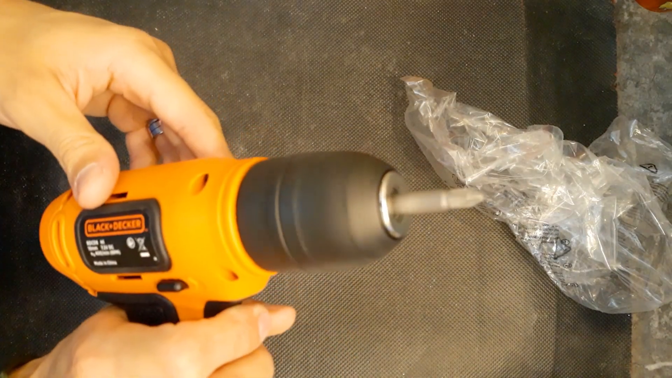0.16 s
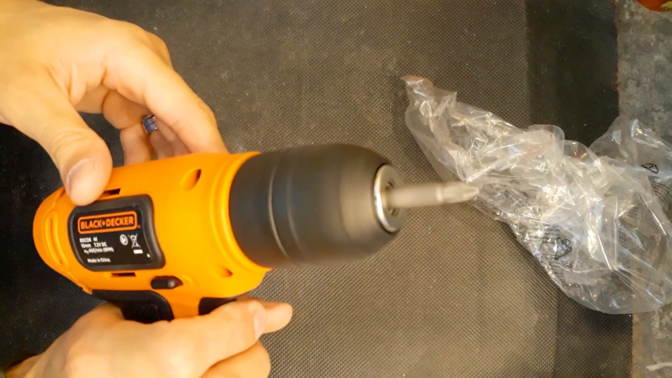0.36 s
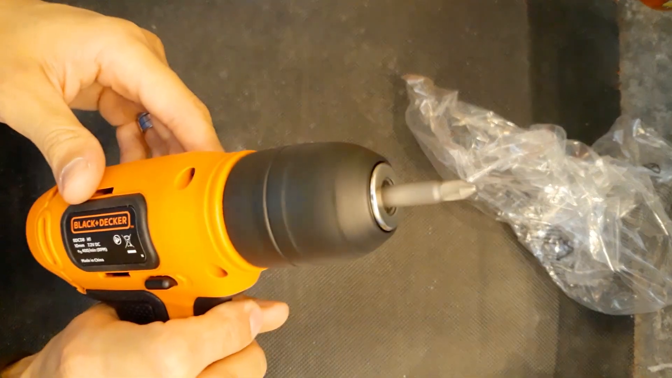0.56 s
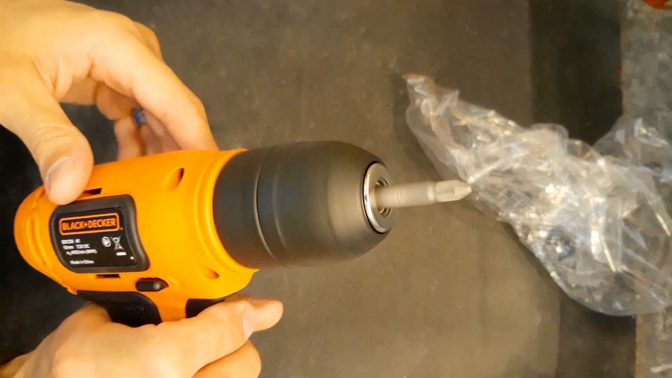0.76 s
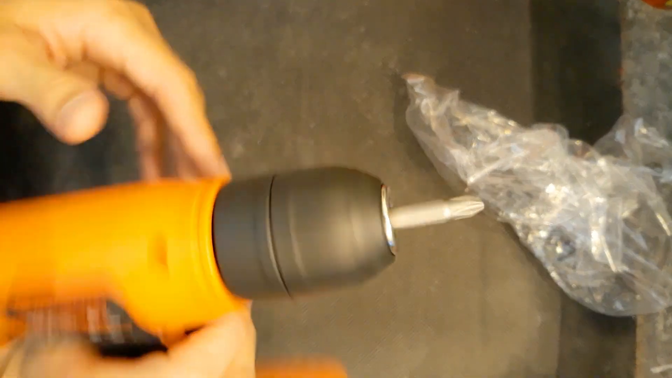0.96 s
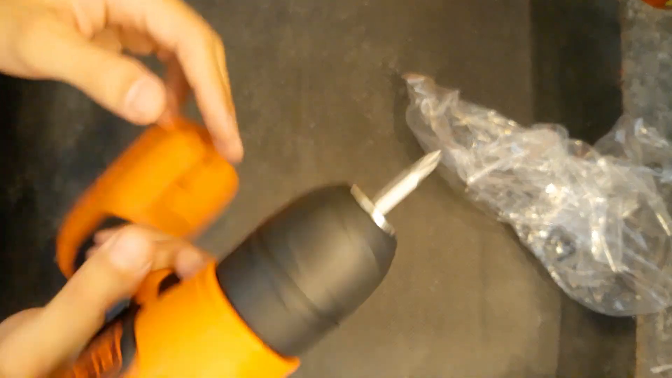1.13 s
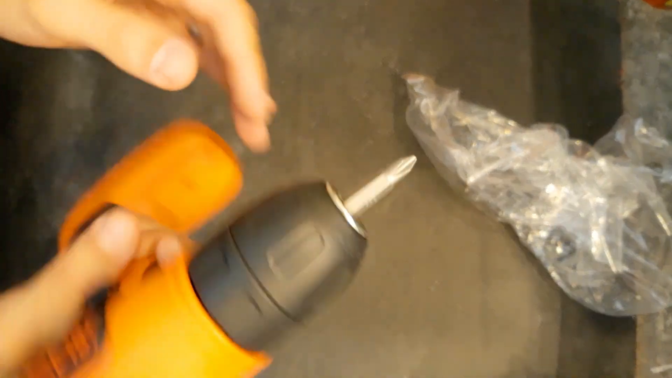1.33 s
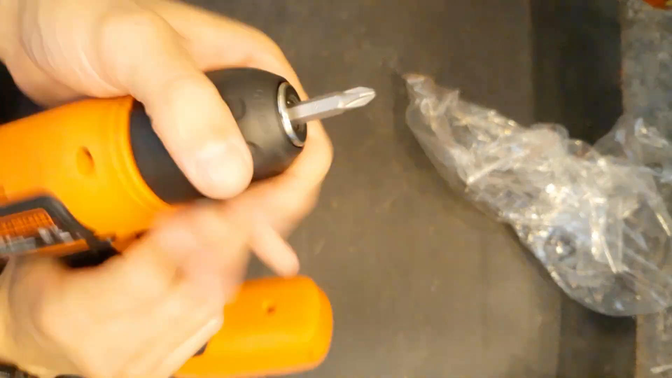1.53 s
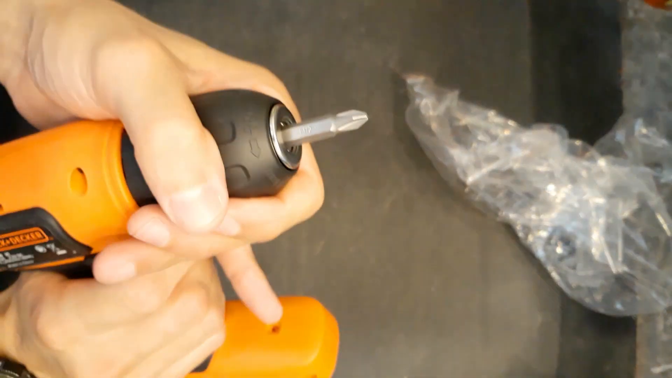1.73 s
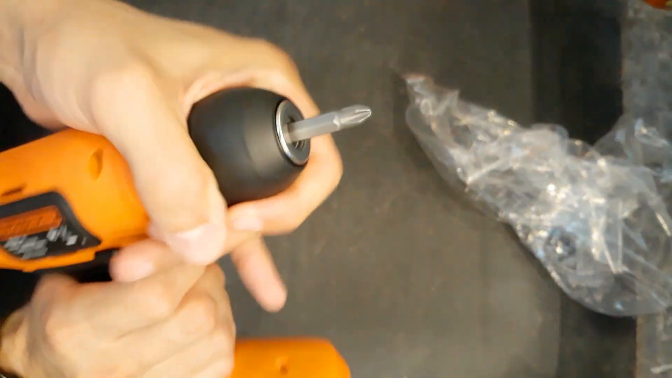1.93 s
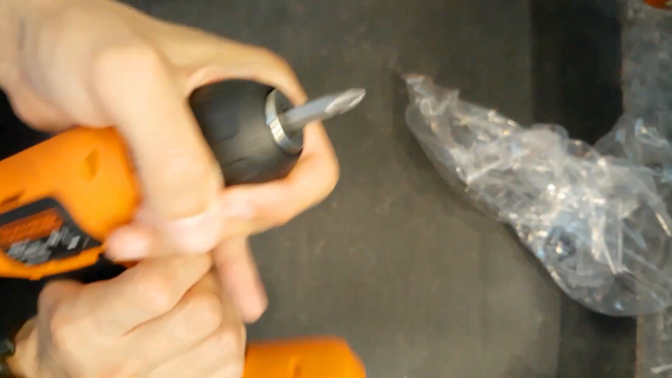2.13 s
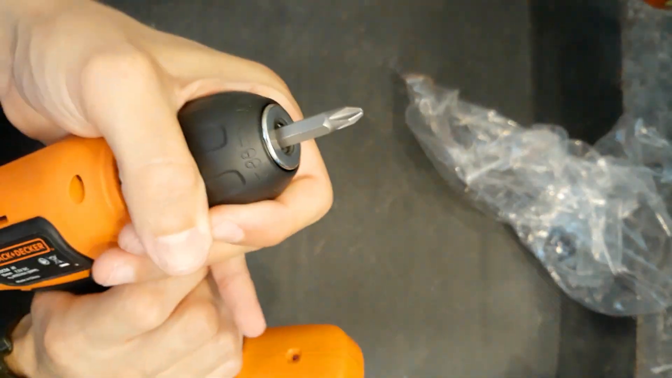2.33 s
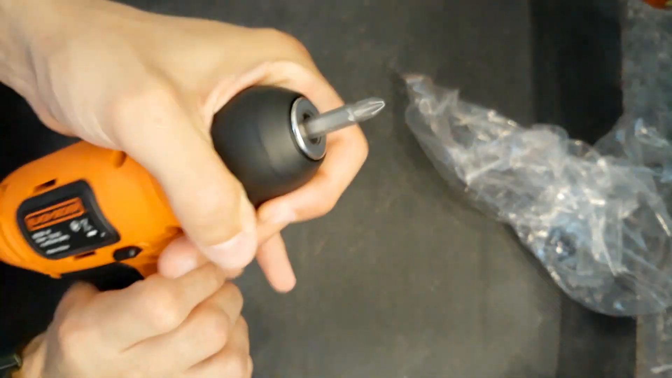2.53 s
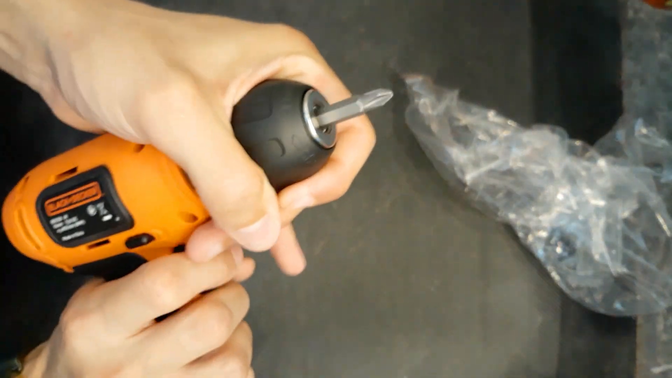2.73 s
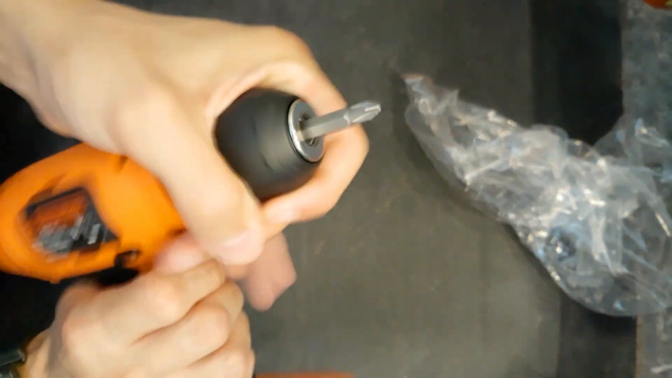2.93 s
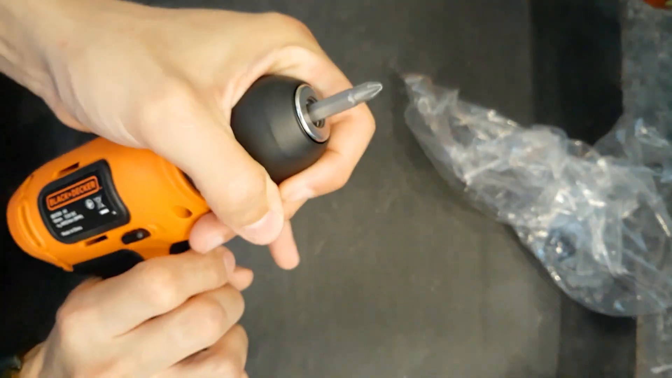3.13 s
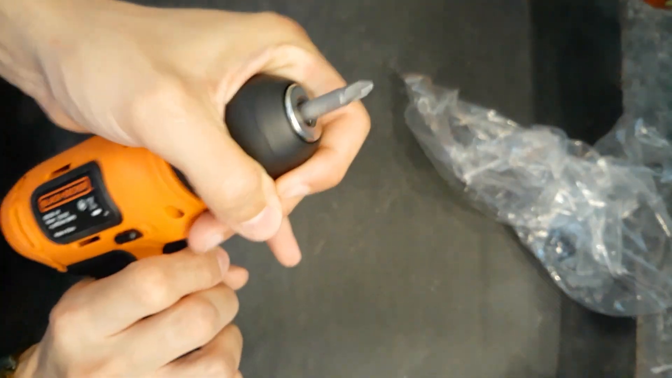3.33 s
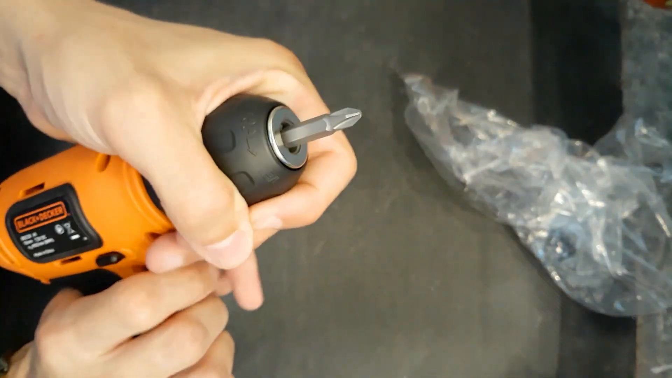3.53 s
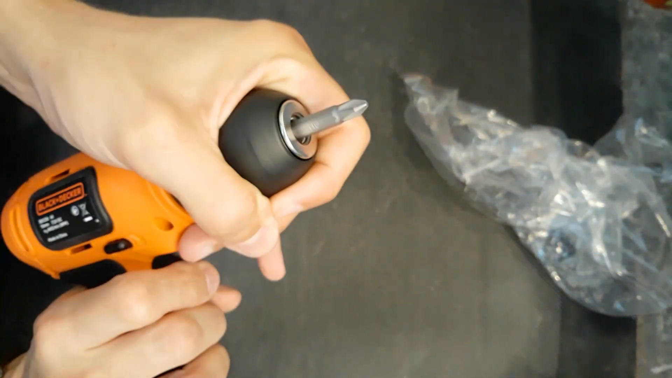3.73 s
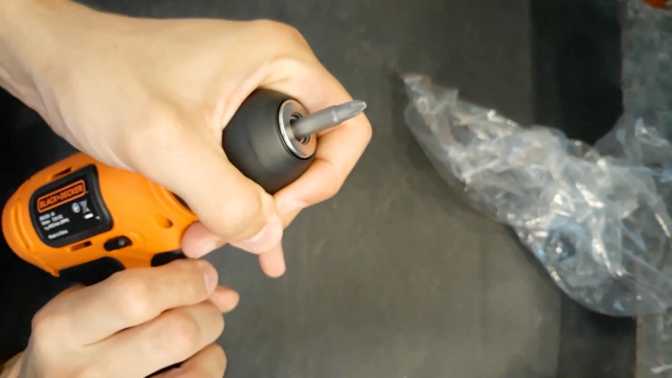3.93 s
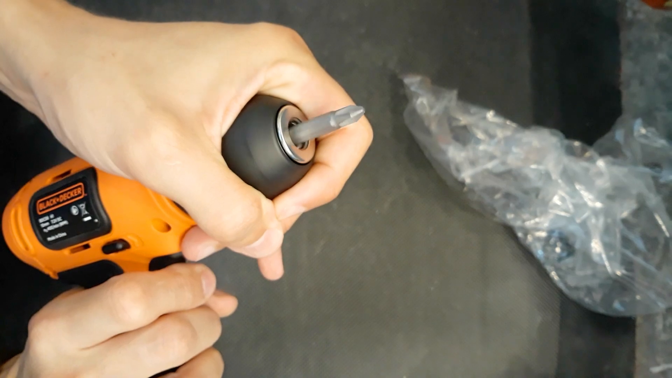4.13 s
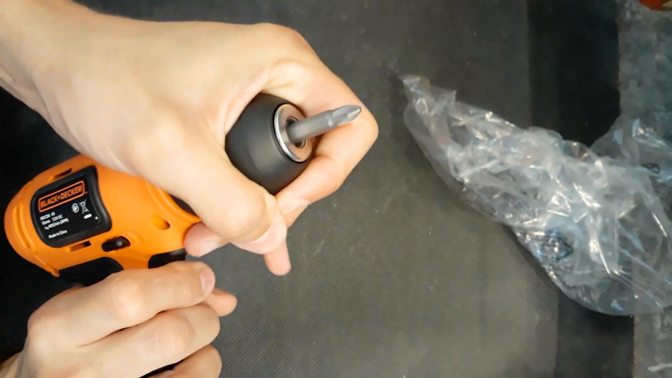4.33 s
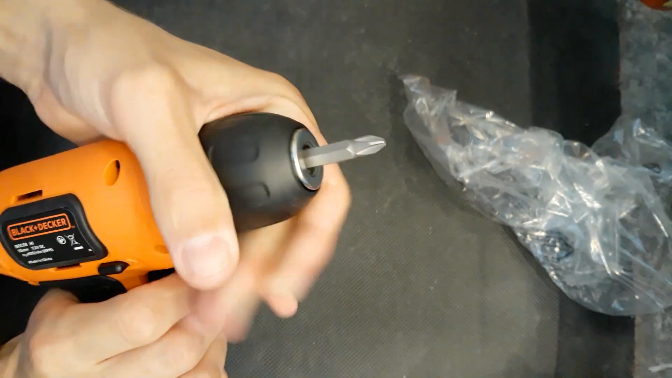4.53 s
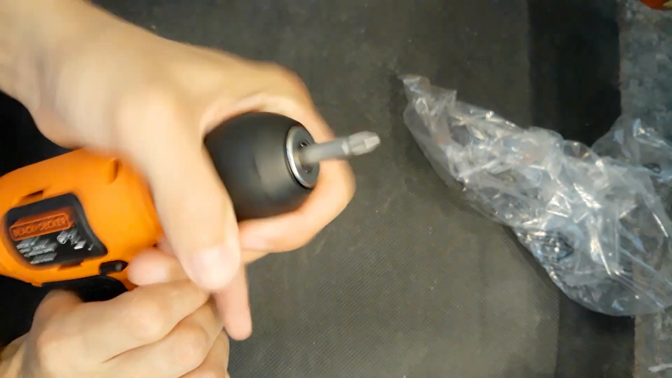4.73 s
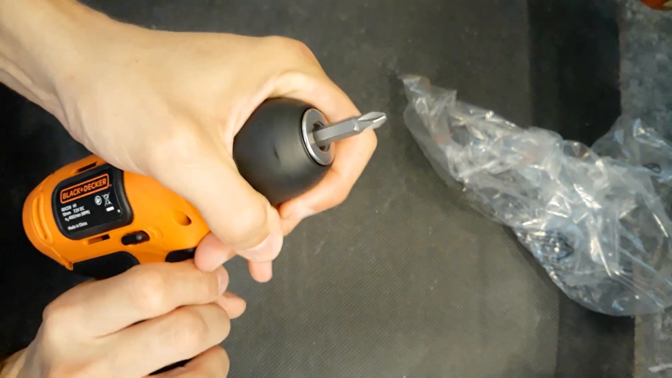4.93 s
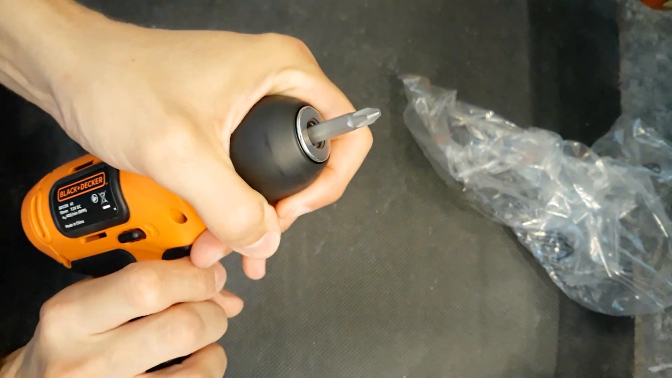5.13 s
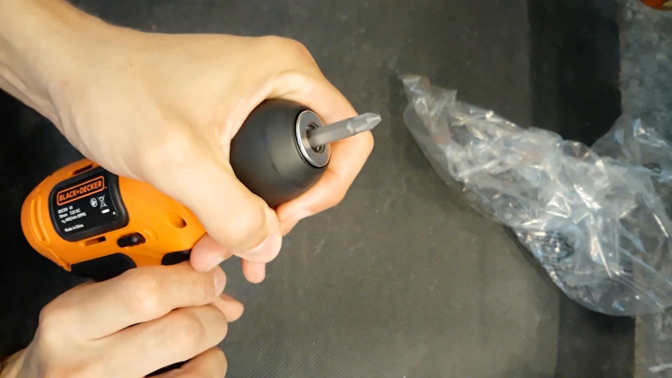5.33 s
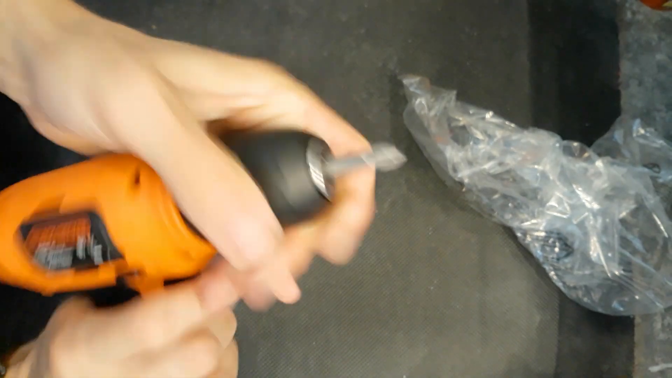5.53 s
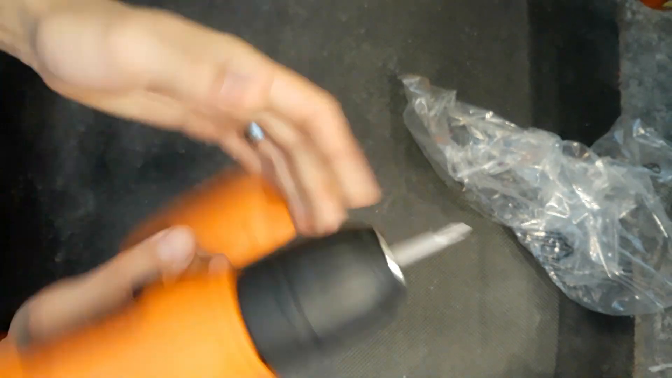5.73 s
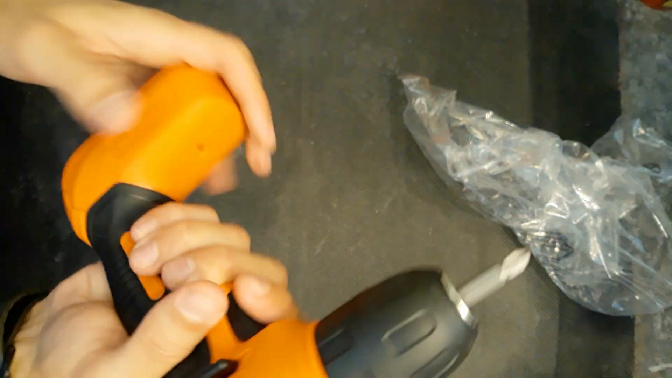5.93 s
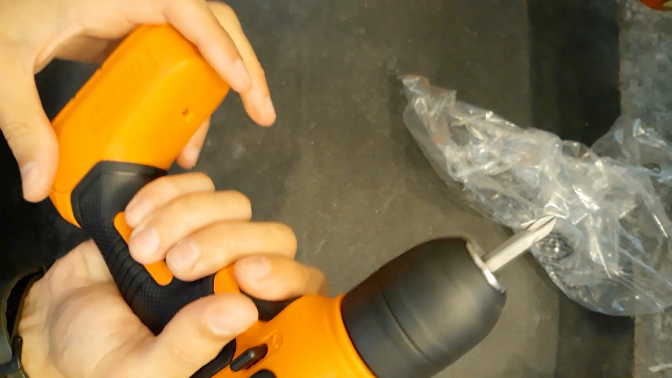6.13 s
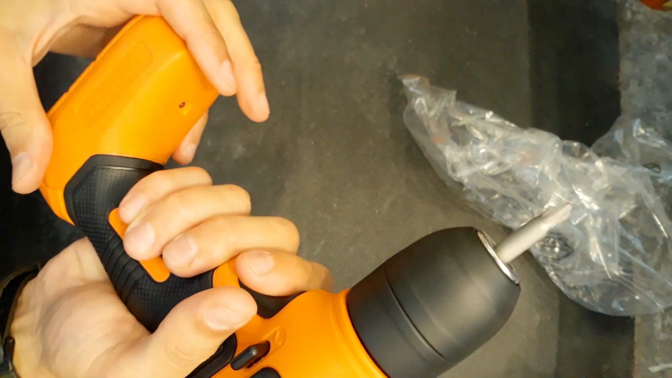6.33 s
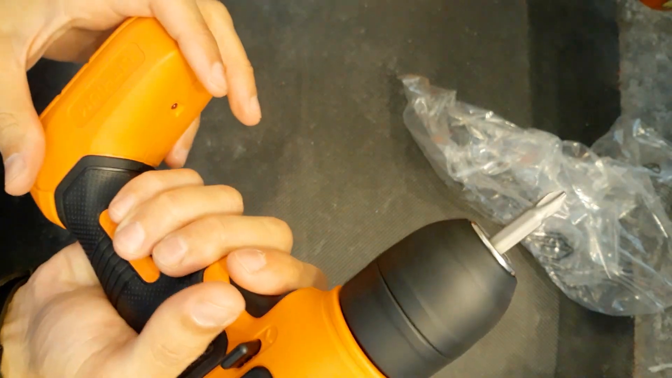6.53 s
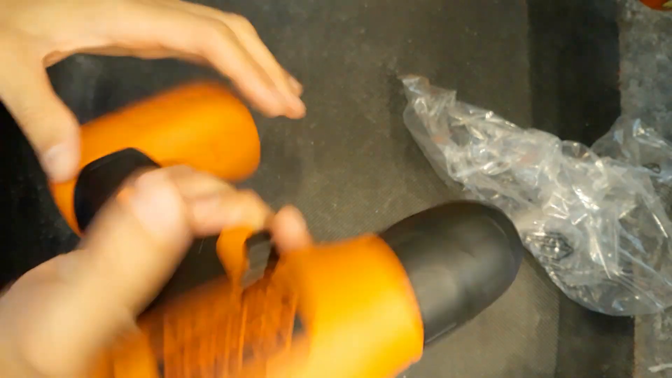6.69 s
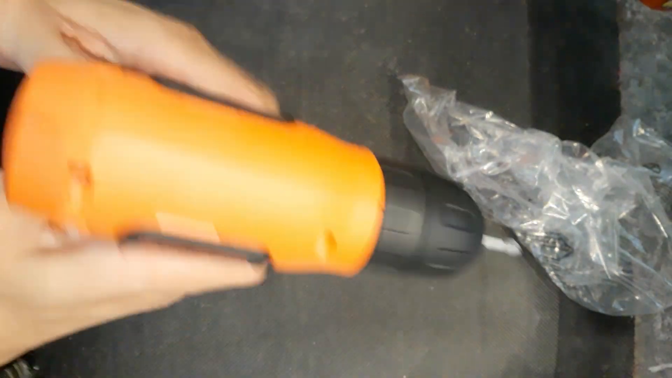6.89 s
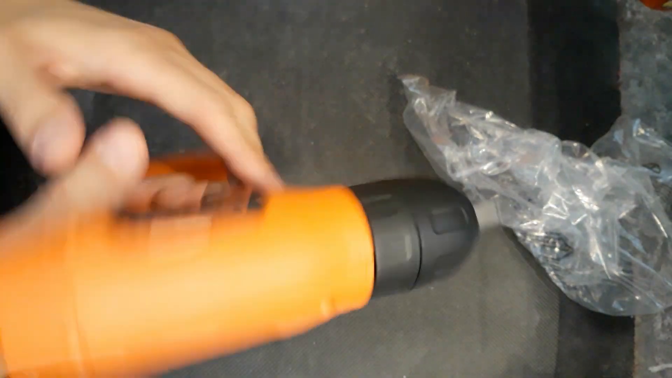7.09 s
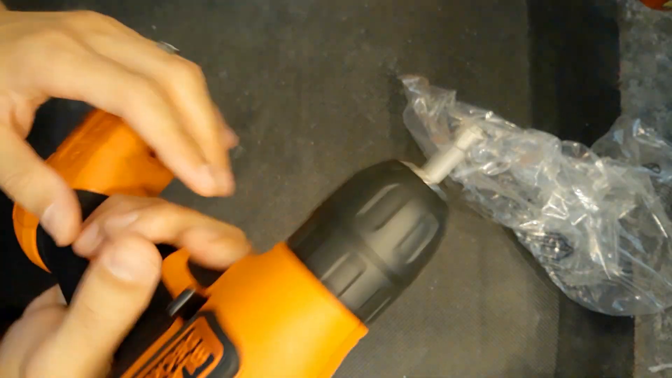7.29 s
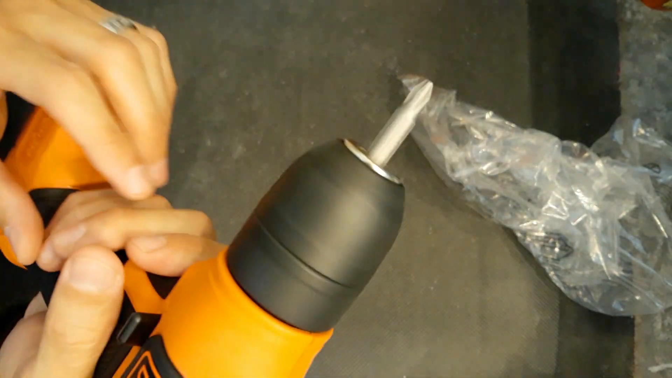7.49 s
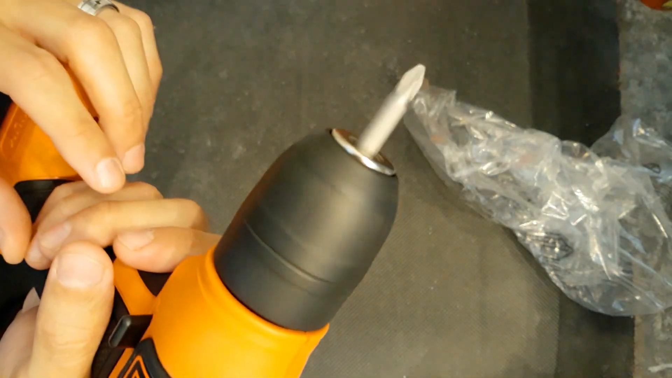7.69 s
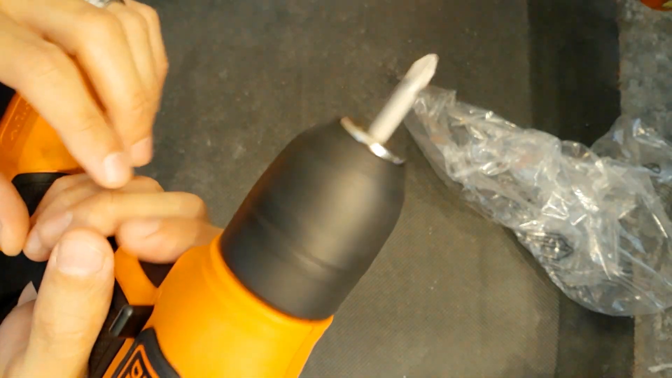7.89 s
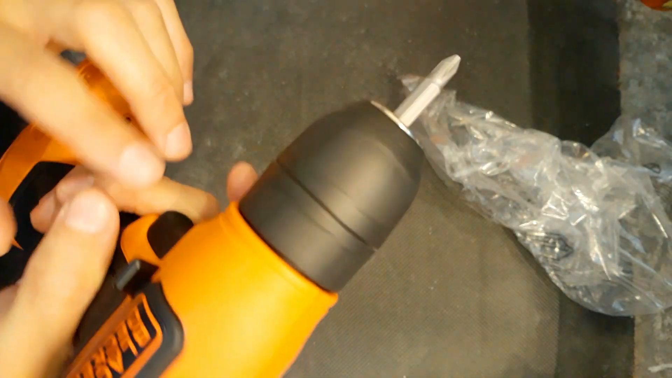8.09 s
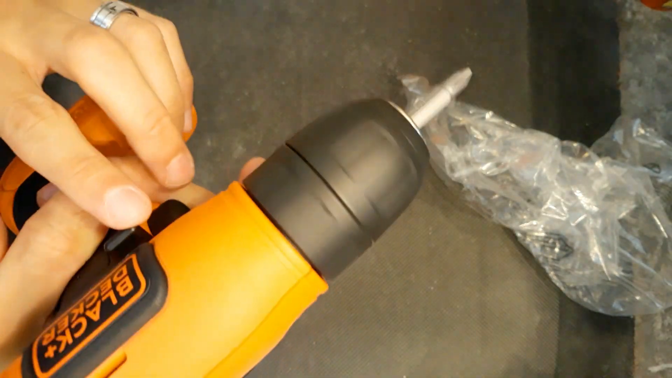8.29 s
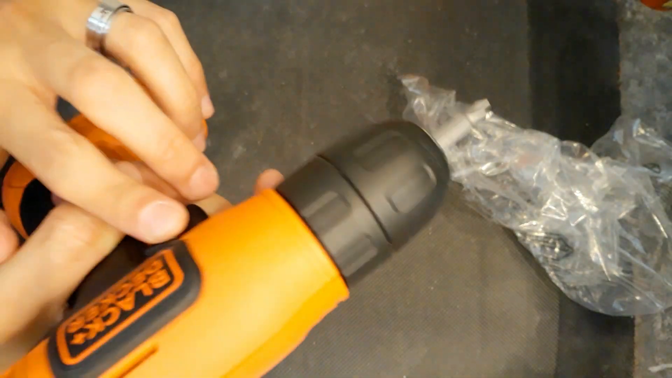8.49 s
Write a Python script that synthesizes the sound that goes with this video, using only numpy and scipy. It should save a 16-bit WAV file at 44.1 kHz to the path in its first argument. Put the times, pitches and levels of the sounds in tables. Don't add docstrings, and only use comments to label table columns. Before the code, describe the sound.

Close phone microphone in a small hard room with short bright echoes, soft air noise and a faint wavering mains hum. A cordless drill is already spinning free at the start, a steady high whine with gear rattle and brush hiss; at 0.9 s it is released and glides down, breaking into clicks by about 1.4 s. Light rubs and plastic ticks follow. Five hand-braked bursts come at about 1.9, 2.5, 3.0, 3.65 and 4.8 s: rougher, buzzing, lower and quickly stopped, the fourth longer and sagging, the last straining lowest before rising at 5.5 s. Handling ticks, then a bouncing switch clack at 5.9 s. A free whine leaps up at 6.2 s, released at 6.5 and coasting down; another starts at 7.45 s, holds until 8.0 and winds down. At 8.48 s two very loud, sharp switch snaps ring the housing almost together.

```python
import sys
import numpy as np
from scipy import signal
from scipy.fft import rfft, irfft
from scipy.io import wavfile
from scipy.ndimage import uniform_filter1d

SR = 44100
rng = np.random.default_rng(int(sys.argv[2]) if len(sys.argv) > 2 else 0)


def invert_db(level):
    return 10 ** (np.asarray(level, dtype=float) / 20)


def file_out(sig):
    cols = np.atleast_2d(sig).T
    lim = np.clip(cols, -1, 1)
    pcm = np.round(lim * 32767).astype(np.int16)
    wavfile.write(sys.argv[1], SR, pcm)


N = 377055

# frequency in Hz, level in dB per Hz.
HELD_BODY = [(150, -77), (250, -24.5), (543, -15), (780, -8.5), (1240, 2.5), (2480, -3.5), (3260, -14),
             (5020, -8), (7210, -10), (8870, -3.5), (9670, -8.5), (15400, -11.5)]


def evened(x):
    return x / np.sqrt(np.mean(x ** 2) + 1e-20)


def read(points, hz):
    f, value = np.transpose(points)
    return np.interp(np.log(hz + 1), np.log(f + 1), value)


def add(mix, s, sound):
    part = mix[round(s * SR):][:len(sound)]
    part += sound[:len(part)]


def drift(count, seconds):
    size = max(int(seconds * SR), 2)
    return evened(uniform_filter1d(uniform_filter1d(rng.standard_normal(count), size), size))


def narrow(x, hz, share):
    edges = np.clip([hz * (1 - share), hz * (1 + share)], 100, 20000)
    return evened(signal.lfilter(*signal.butter(2, edges, "band", fs=SR), x))


def housing_db(hz):
    # frequency in Hz, width in Hz, lift in dB.
    resonances = [(535, 123, 5.5), (1127, 134, 4), (1740, 250, 2.5), (2960, 130, 4), (3330, 730, 8.5),
                  (3800, 360, 5.5), (4445, 1500, 10), (4470, 130, -1), (5500, 330, -3), (7030, 200, -3.5),
                  (9970, 900, -9), (13200, 860, -6.5), (14200, 250, -4), (9140, 2000, 4), (11070, 820, -6),
                  (15150, 300, -10), (12900, 500, -6), (14050, 220, -10), (9400, 230, -3.5),
                  (12000, 380, -0.5), (13400, 290, 5.5), (14600, 300, 6.5)]
    return sum(db / (1 + (2 * (hz - f) / width) ** 2) for f, width, db in resonances)


def coloured(x, body, lo_hz, hi_hz, facing=1):
    hz = np.fft.rfftfreq(len(x), 1 / SR)
    band = np.sqrt(1 / (1 + (lo_hz / (hz + 1)) ** 16) / (1 + (hz / hi_hz) ** 16))
    return evened(irfft(rfft(x) * band * invert_db(read(body, hz) + facing * housing_db(hz)), len(x)))


def room_air():
    # frequency in Hz, level in dB per Hz.
    spectrum = [(15, -27), (25, -40), (79, -0.5), (339, -2), (398, 4), (612, -9), (801, -5), (1400, -7.5),
                (4350, -5), (6180, -11), (15400, -23.5)]
    air_db = -44.5
    hz = np.fft.rfftfreq(N, 1 / SR)
    air = invert_db(air_db - 6.5) * evened(irfft(rfft(rng.standard_normal(N)) * invert_db(read(spectrum, hz)), N))
    low = signal.sosfilt(signal.butter(2, 700, fs=SR, output="sos"), air)
    return low + (air - low) * invert_db(2.4 * drift(N, .04) - 4)


def mains_hum():
    # frequency in Hz, level in dB.
    steady = [(99, -66), (203, -66.5), (400, -65), (800, -70.5)]
    # middle in seconds, length in seconds, frequency in Hz, peak in dB.
    moments = [(0.054, 0.82, 249.5, -50.5), (1.283, 0.37, 249.5, -49), (1.802, 1.1, 249.5, -54.5),
               (3.61, 0.35, 249.5, -49.5), (4.393, 1.5, 249.5, -58.5), (6.597, 1.63, 249.5, -59),
               (8.143, 0.34, 249.5, -49), (8.55, 0.27, 249.5, -49.5), (1.219, 0.18, 297.7, -47),
               (2.04, 0.53, 298.7, -52.5), (3.606, 1.1, 298.7, -52), (6.421, 0.35, 303.8, -52),
               (6.993, 0.47, 302.3, -51), (7.32, 0.23, 295.8, -44), (7.803, .6, 301.5, -52)]
    rest_db = -69.5
    out, t = np.zeros(N), np.arange(N) / SR
    swells = {f: rest_db for *_, f, _ in moments}
    for s, length, f, db in moments:
        swells[f] = np.maximum(swells[f], db - 16 * (2 * (t - s) / length) ** 2)
    for f, db in steady + list(swells.items()):
        turns = np.cumsum(f + 2.6 * drift(N, 0.0324)) / SR
        out += np.sqrt(2) * invert_db(db - 0.5 + 3.3 * drift(N, 0.017)) * np.cos(2 * np.pi * turns)
    return out


def rumble():
    # time in seconds, level in dB.
    trembling = [(0, -69), (1, -75), (3.001, -84), (5.7, -82), (6.1, -65), (8.55, -74)]
    deep = signal.sosfilt(signal.butter(2, [25, 60], "band", fs=SR, output="sos"), rng.standard_normal(N))
    return invert_db(np.interp(np.arange(N) / SR, *np.transpose(trembling))) * evened(deep)


def room(x):
    # frequency in Hz, time to fall by 60 dB in seconds.
    dying = [(300, 0.69), (2000, 0.4), (6000, 0.15), (15000, 0.36)]
    taps = np.zeros(SR)
    at = np.arange(200, SR - 20, 20)
    taps[at + rng.integers(0, 20, len(at))] = rng.choice([-1., 1.], len(at))
    hz, t, z = signal.stft(taps, SR, nperseg=256)
    tail = signal.istft(z * invert_db(-60 * t / read(dying, hz)[:, None]), SR, nperseg=256)[1]
    return signal.fftconvolve(x, tail / np.linalg.norm(tail))[:N]


def rubbing():
    # start in seconds, end in seconds, level in dB, pitch in Hz.
    rubs = [(1.534, 1.66, -52.5, 8400), (1.6, 1.66, -50.5, 3600), (1.655, 1.68, -60, 1850),
            (1.74, 1.8, -53.5, 4600), (7.26, 7.34, -63, 1900), (7.15, 7.21, -58, 3800),
            (7.35, 7.44, -67, 2300), (5.95, 5.99, -48.5, 6400), (4.59, 4.64, -35.5, 3200),
            (5.76, 5.8, -46, 3350), (7.088, 7.138, -57, 8000), (7.112, 7.198, -69, 11000),
            (7.338, 7.432, -63, 13000)]
    out = np.zeros(N)
    for start, end, db, hz in rubs:
        size = round((end - start) * SR)
        noise = rng.standard_normal(SR // 5)
        add(out, start, invert_db(db) * narrow(noise, hz, 0.17)[:size] * np.hanning(size))
    return out


def plastic_ticks():
    # time in seconds, peak in dB, pitch in Hz.
    clicks = [(1.506, -40, 4360), (1.725, -46, 5100), (1.7554, -47, 4470), (1.8607, -39.5, 3900),
              (2.2, -34, 3300), (2.2005, -31, 7900), (5.7744, -32, 3370), (2.392, -44, 4370),
              (3.4503, -22, 4060), (5.603, -29, 3220), (5.8194, -38, 3500), (5.896, -44, 5300),
              (5.908, -37, 5250), (6.114, -51, 3800), (7.1646, -44, 5000), (7.3432, -48, 12000),
              (7.3756, -41, 5030), (7.102, -42, 8200), (1.459, -46, 5050), (8.4895, -14, 5330),
              (8.482, -13, 3750)]
    # time in seconds, level in dB,
    # pitch in Hz.
    further = [(1.9037, -32, 3600), (2.4793, -28, 3200), (6.1934, -35, 3900), (7.4454, -26, 4000),
               (1.6013, -50, 9000), (7.411, -52, 8000), (7.426, -46, 3300), (7.367, -50, 5100),
               (7.307, -52, 1800), (1.665, -50, 1500)]
    out, t = np.zeros(N), np.arange(SR // 5) / SR
    for s, db, hz in clicks + further:
        noise = rng.standard_normal(len(t))
        tick = narrow(noise, hz, .04) * invert_db(-60 * t / .055)
        tick += .05 * np.diff(noise, prepend=0) * invert_db(-60 * t / 0.013)
        add(out, s, invert_db(db - 4.0) * tick)
    return out


def dry_snaps():
    # time in seconds, level in dB.
    snaps = [(1.602, -42), (1.727, -53), (1.903, -41), (2.296, -53), (2.478, -40), (2.985, -46),
             (3.641, -42), (7.367, -56), (8.4785, -24)]
    out, t = np.zeros(N), np.arange(SR // 5) / SR
    for s, db in snaps:
        add(out, s, invert_db(db - 60 * t / .02) * np.diff(rng.standard_normal(len(t)), prepend=0))
    return out


def switch_slider():
    # time in seconds, level in dB, bright crack in dB against it.
    throws = [
        (5.9198, -27.5, -11),
        (5.9315, -31.5, -2.5),
        (5.941, -40, -10),
        (5.958, -43, -8),
    ]
    # frequency in Hz, level in dB, time to fall by 60 dB in seconds.
    slider = [(1140, 3.5, 0.033), (1700, -3.5, 0.053), (2280, -4, 0.032), (2500, -5, 0.039),
              (3080, -4, .03), (3730, -3, 0.031), (5420, -15, .05), (5950, -6, 0.033), (7000, -8, 0.037),
              (8200, -10, .04)]
    out, t = np.zeros(N), np.arange(SR // 5) / SR
    for s, db, bright_db in throws:
        noise = rng.standard_normal(len(t))
        modes = sum(invert_db(level - 60 * t / t60) * narrow(noise, hz, 0.066) for hz, level, t60 in slider)
        crack = invert_db(bright_db - 60 * t / 0.069) * np.diff(noise, prepend=0)
        add(out, s, invert_db(db) * (modes + crack))
    return out


def switch_knocks():
    # time in seconds, peak in dB, low body in dB, bright crack in dB (both against the peak), low body in Hz.
    knocks = [
        (8.4822, 2, -22, -16, 1536),
        (8.4895, 3.5, -12, -18, 1740),
    ]
    out, t = np.zeros(N), np.arange(SR // 5) / SR
    ring = .5 * invert_db(-60 * t / .008) + .2 * invert_db(-60 * t / .1)
    ping = 1.6 * np.sin(2 * np.pi * 5300 * t) * invert_db(-60 * t / 0.0039)
    for s, db, low_db, bright_db, low_hz in knocks:
        noise = rng.standard_normal(len(t))
        crack = coloured(noise, HELD_BODY, 1280, 8400)
        crack += invert_db(bright_db + 8.0) * evened(np.diff(noise, n=2, prepend=[0, 0]))
        thump = invert_db(low_db - 13.0) * narrow(noise, low_hz, 0.072) * invert_db(-60 * t / 0.03)
        add(out, s, invert_db(db - 6.5) * (crack * ring + ping + thump))
    return out


def housing_flares():
    # start in seconds, end in seconds, level in dB, pitch in Hz.
    flares = [(1.03, 1.22, -30.5, 1820), (1.06, 1.22, -27, 3420), (0.98, 1.08, -27, 2960),
              (1.33, 1.46, -53, 3300), (6.86, 7.0, -37, 3030)]
    out = np.zeros(N)
    for start, end, db, hz in flares:
        size = round((end - start) * SR)
        noise = rng.standard_normal(SR // 4)
        add(out, start, invert_db(db) * narrow(noise, hz, 0.033)[:size] * np.hanning(size) ** .5)
    return out


def run_down(rows, drag):
    stop_hz, inertia_s = 95, .03
    s, hz, db = np.transpose(rows)
    friction, rate = drag
    rest = friction / rate
    end = s[-1] + np.log((hz[-1] + rest) / (stop_hz + rest)) / rate
    t = np.arange(s[0], end, 1 / SR)
    after = np.maximum(t - s[-1], 0)
    speed = (np.interp(t, s, hz) + rest) * np.exp(-rate * after) - rest
    speed = uniform_filter1d(speed, size=round(inertia_s * SR), mode="nearest")
    return t, after, speed, np.interp(t, s, db)


def gear_blows(turns, hz, after, spin):
    step = turns.astype(int)
    strength = np.minimum(rng.exponential(1, step[-1] + 4), 4)
    uneven = strength[step] * .5 + strength[step // 6]
    lumps_db = spin["lumps_db"] + 2.2 * np.clip(after / .05, .3, 1) * np.clip(1 - hz / 450, 0, 1)
    blows = invert_db(lumps_db * uneven) * (1 + spin["pulsing"] * np.exp(-(turns % 1) / 0.4))
    return blows * invert_db(spin["beat_db"] * np.cos(2 * np.pi * turns / 4.45 + 1.3 * drift(len(turns), 0.13)))


def gear_rattle(blows, rattle_db, hz, after, spin):
    # frequency in Hz, relative width, level in dB.
    gear_case = [(3300, 0.086, 3), (4360, 0.15, -8.5), (2760, 0.052, -6.5)]
    octaves = np.log2(hz / 930)
    coasting = np.clip(after / 0.004, 0, 1)
    teeth = blows * rng.standard_normal(len(hz))
    teeth /= np.sqrt(uniform_filter1d(teeth ** 2, size=4000))
    full_db, octave_db, no_current_db = spin["hiss"]
    hiss_db = full_db + octave_db * np.maximum(octaves, -1.5) + no_current_db * (1 - np.exp(-after / 0.0059))
    knock_db = spin["slowing_db"] * coasting * np.clip((720 - hz) / 250, 0, 1)
    body = spin["body"]
    out = invert_db(rattle_db - 0.5 * (8.5 - coasting) - 0.087 * knock_db) * coloured(teeth, body, 2310, 6760)
    out += invert_db(rattle_db + spin["low_db"] + 0.43 * coasting) * coloured(teeth, body, 200, 1945)
    out += invert_db(rattle_db + hiss_db - 2.5) * coloured(teeth, body, 4840, 16000, spin["facing"])
    case = sum(invert_db(db) * narrow(teeth, f, share) for f, share, db in gear_case)
    return out + invert_db(rattle_db + spin["case_db"] + knock_db) * case


def tone_levels(t, after, hz, pose, spin):
    *tone_db, drive_db, _ = pose
    octaves = np.log2(hz / 930)
    coasting = np.clip(after / 0.004, 0, 1)
    slack_db = np.clip(1.3 * uniform_filter1d(np.gradient(octaves) * SR, size=600), 0, 11) * (t > t[0] + .1)
    surge_top_db, surge_s = spin["surge"]
    since = (t - t[0]) / surge_s
    surge_db = surge_top_db * since * np.exp(1 - since) * (t[0] > 0)
    dying_db = 45 * np.clip(1 - hz / 350, 0, 1) * coasting
    levels = []
    for k, db, change in zip((1, 2, spin["third"]), tone_db, spin["coast_db"]):
        start_db = surge_db * k / 2 if k < 3 else -slack_db
        levels.append((k, db + (change + spin["slow_db"] * octaves) * coasting + start_db - dying_db))
    levels.append((4, spin["coast_db"][3] - 40 * (1 - coasting) - 30 * np.clip(hz / 600 - 1, 0, 1)))
    for k, db in spin["orders"]:
        levels.append((k, db + 1.0 + drive_db - (14 if k > 1 else 4) * coasting - (k > 2.2) * slack_db))
    return levels


def motor_tones(levels, turns, blows, rattle_db, hz, spin):
    out, count = np.zeros(len(hz)), len(hz)
    throb = uniform_filter1d(blows, size=90)
    throb = (throb / uniform_filter1d(throb, size=4000)) ** .85
    for k, db in levels:
        flutter_db = spin["fuzz_db"] * min(1, 0.5 + k / 8) * drift(count, 0.0021 * (1 + 3 / k))
        ring_db = spin["ringing"] * (housing_db(k * hz) - 11.5)
        gain = np.sqrt(2) * invert_db(rattle_db + db + read(spin["voice"], k * hz) + ring_db + flutter_db)
        smear = (k > 4.5) * spin["smear"] * drift(count, 0.0039)
        tone = np.cos(2 * np.pi * (k * turns + rng.random() + smear))
        out += gain * (throb if k > 2.2 else 1) * tone
    return out


def burst(rows, pose, drag, spin):
    t, after, hz, driven_db = run_down(rows, drag)
    unloaded = 1 - np.exp(-after / 0.0059)
    coast_db = read(spin["dying"], hz) + pose[-1] + spin["tilt"] * (np.log2(hz / 930) + 1)
    rattle_db = driven_db + unloaded * (coast_db - driven_db)
    turns = np.cumsum(hz * (1 + spin["wobble"] * drift(len(t), 0.00427))) / SR
    blows = gear_blows(turns, hz, after, spin)
    out = gear_rattle(blows, rattle_db, hz, after, spin)
    levels = tone_levels(t, after, hz, pose, spin)
    out += motor_tones(levels, turns, blows, rattle_db, hz, spin)
    fade = np.minimum(1, np.minimum((t - t[0] + (t[0] == 0)) / .012, (t[-1] - t) / .02))
    return t[0], out * fade


def free_drill():
    # time in seconds, commutator rate in Hz, gear rattle in dB.
    bursts = [
        [(0.0, 927, -22.5), (0.15, 945, -22), (0.4, 946.5, -22), (0.9, 958.4, -22.5)],
        [(6.198, 359, -30), (6.226, 609.5, -25.5), (6.265, 866, -24), (6.32, 914, -23.5), (6.53, 937, -23)],
        [(7.442, 337, -30.5), (7.47, 596, -25), (7.5, 786, -23.5), (7.56, 900, -23.5), (7.625, 936.6, -23),
         (8.018, 935, -23)],
    ]
    # tones on 1, 2 and 3 times the rate in dB, further tones in dB, run-down rattle in dB.
    poses = [(-15, -11.5, -10, -1.5, 0.69), (-15.5, -13, -7, -5.5, 1.55), (-12.5, -13, -4.5, -5, 1.13)]
    # fading of the run-down in dB per octave, share of treble ring facing the phone.
    tilts = [(-1, 0.75), (-3, 0.98), (-2, 1)]
    # dry friction in Hz per second, drag per second.
    drags = [(711, 1.5), (572, 1.55), (556, 1.56)]
    # multiple of the commutator rate, level in dB.
    forward = [(.3333, -20), (.6667, -17.5), (1.393, -17), (1.667, -14), (1.727, -18), (1.914, -19),
               (2.78, -15), (3.12, -15), (3.448, -26), (3.516, -18), (3.713, -22), (3.93, -30), (3.98, -26),
               (4.5, -36), (5.005, -26), (5.12, -25), (5.667, -15), (6.097, -12.5), (6.176, -24), (8, -11),
               (9, -10), (9.235, -10), (10, -10), (10.225, -9), (11, -15), (12.05, -23), (12.67, -19),
               (13, -20), (14, -18), (15.34, -23)]
    # multiple of the commutator rate, level in dB.
    reverse = [(.3333, -17), (.6667, -23.5), (1.667, -11), (2.4, -10), (3.99, -11), (4.35, -11),
               (4.645, -15.5), (5, -11), (5.66, -19), (6, -12.5), (7.055, -7.5), (8, -6.5), (9.665, -27),
               (10, -20), (12, -17), (12.335, -24), (13.335, -23), (15, -20), (15.66, -29)]
    # commutator rate in Hz, level in dB.
    dying = [(95, -74), (150, -49), (235, -37), (430, -27), (500, -25.5), (930, -22)]
    # frequency in Hz, level in dB per Hz.
    body = [(150, -60), (250, -55), (313, -72), (353, -16), (645, -17), (691, -14), (927, -8), (2520, 1),
            (2890, -2.5), (6180, -7), (11900, 3.5), (15400, -2)]
    # frequency in Hz, dB against the rattle.
    voice = [(220, -7), (310, 0.5), (540, 2.5), (690, -5), (950, 1.5), (1250, -2), (1700, -1), (2200, 1),
             (2600, -7.5), (2850, 0), (15000, -5)]
    # dB, seconds
    spin = dict(dying=dying, third=3, body=body, voice=voice, coast_db=(4.5, 9.5, -8, -12), surge=(9, .03),
                fuzz_db=2.6, hiss=(-5, 7, -2.5), slow_db=6.5, low_db=-10.5, wobble=0.00037, lumps_db=0.38,
                pulsing=1.0, ringing=0.55, beat_db=0.5, case_db=-52, slowing_db=35.5, smear=.006)
    out = np.zeros(N)
    for rows, pose, (tilt, facing), orders, drag in zip(bursts, poses, tilts, (forward, reverse, reverse), drags):
        add(out, *burst(rows, pose, drag, dict(spin, tilt=tilt, facing=facing, orders=orders)))
    return out


def held_drill():
    # time in seconds, commutator rate in Hz, gear rattle in dB.
    bursts = [
        [(1.912, 479.6, -24.5), (1.94, 602.7, -18), (1.965, 704.4, -13.5), (1.995, 723.5, -14.5),
         (2.03, 663, -14), (2.066, 558.6, -13.5), (2.122, 536.5, -17.5)],
        [(2.478, 418.5, -33), (2.503, 539, -21), (2.548, 722, -19), (2.595, 695, -16), (2.69, 558.2, -17),
         (2.785, 555, -20)],
        [(2.994, 417.2, -34), (3.022, 532, -21), (3.069, 628.7, -17), (3.145, 571.6, -16.5), (3.301, 535, -19),
         (3.361, 553, -18), (3.441, 644, -17.5)],
        [(3.652, 425, -22), (3.698, 561, -18), (3.808, 509.3, -18.5), (4.044, 511.6, -19), (4.2, 483.6, -18),
         (4.345, 409.4, -19.5), (4.384, 413, -17.5), (4.44, 533, -17.5), (4.48, 564, -25)],
        [(4.806, 419.4, -34), (4.84, 574, -17), (4.895, 579.3, -16.5), (4.972, 400.3, -18.5),
         (5.05, 309, -20.5), (5.33, 355.6, -20.5), (5.5, 374.8, -19.5), (5.564, 491, -16.5), (5.6, 524, -24)],
    ]
    # tones on 1, 2 and 4 times the rate in dB, further tones in dB, run-down rattle in dB.
    poses = [(-13.5, -4, 1.2, -7, 4), (-9, -2.5, 0.5, -6.5, 1), (-7, -3.5, 3.5, -7.5, 2.5),
             (-10, -2.5, 4.8, -8, 1.5), (-10.5, -2.5, 0.59, -7.5, 4.5)]
    case_levels = [-6.5, -12, -20.5, -18, -18]
    hiss_left = [-4, -9, -4, -9, -10]
    drag = (1500, 1)
    # multiple of the commutator rate, level in dB.
    orders = [(1.12, -10.5), (1.333, -8.5), (5.67, -8), (6, 4.5), (6.33, -23), (7.67, -12), (8, 0.5),
              (8.33, -8), (10, -0.5), (12, -3), (14, -6.5), (16, -7), (18, -9)]
    # commutator rate in Hz, level in dB.
    dying = [(95, -77), (170, -53), (245, -44), (340, -38.5), (530, -28), (640, -17)]
    # frequency in Hz, dB against the rattle.
    voice = [(300, -19.5), (520, -10.5), (720, -27.5), (900, -14.5), (1250, -4.5), (1480, -8.5),
             (1800, -9.5), (2020, -23.5), (2250, -17.5), (2800, -10), (3300, -4.5), (3750, -7.5),
             (4300, -3), (5000, -2), (5600, -1), (7000, -5), (9000, -2.5), (12000, -31)]
    spin = dict(dying=dying, third=4, orders=orders, body=HELD_BODY, voice=voice, coast_db=(-3, 0, -9, -44),
                surge=(3.5, .015), slowing_db=-3.5, tilt=0, slow_db=-2.0, low_db=-10.0, lumps_db=0.5,
                pulsing=0.92, facing=0.47, ringing=0.2, beat_db=2.0, smear=.014, wobble=.006, fuzz_db=3.3)
    out = np.zeros(N)
    for rows, pose, case_db, left_db in zip(bursts, poses, case_levels, hiss_left):
        add(out, *burst(rows, pose, drag, dict(spin, case_db=case_db, hiss=(-1.5, 6, left_db))))
    return out


def scene():
    background = room_air() + mains_hum()
    clicks = rubbing() + plastic_ticks() + dry_snaps() + switch_slider() + switch_knocks() + housing_flares()
    clicks = signal.sosfilt(signal.butter(4, 700, "high", fs=SR, output="sos"), clicks)
    motor = free_drill() + held_drill()
    echoes = room(invert_db(-9.0) * motor + invert_db(-5.5) * clicks)
    return (motor + clicks + echoes + background)[None]


def low_pass(x):
    return signal.sosfilt(signal.butter(12, 16820, fs=SR, output="sos"), x)


def record(dry):
    limited = np.tanh(dry / 1.02) * 1.02
    limited = signal.sosfilt(signal.butter(4, 62, "high", fs=SR, output="sos"), limited) + rumble()
    edge = signal.firwin(1201, 15500, window=("kaiser", 9), fs=SR)
    finished = signal.oaconvolve(limited, edge[None], "same")
    return low_pass(finished)


dry = scene()
out = record(dry)
file_out(out)
```